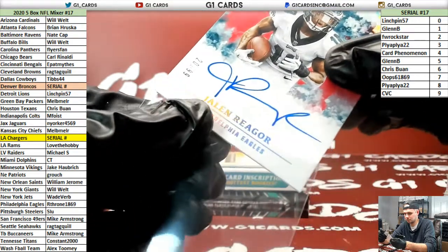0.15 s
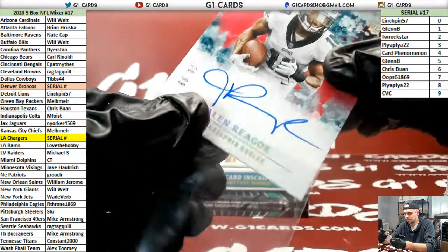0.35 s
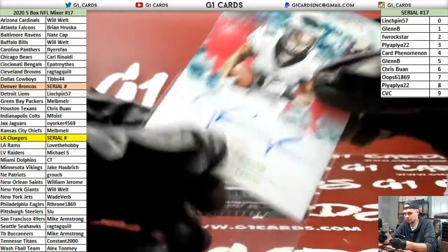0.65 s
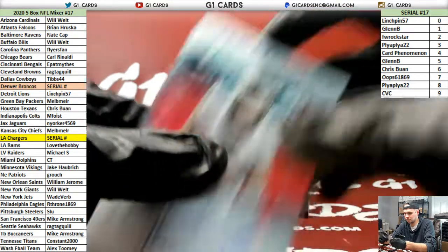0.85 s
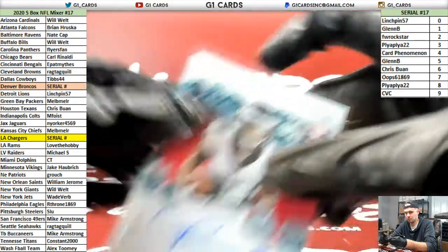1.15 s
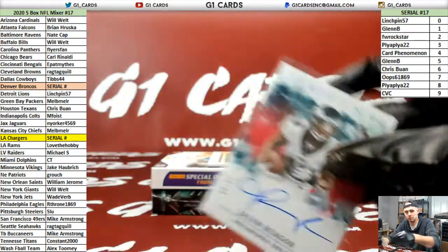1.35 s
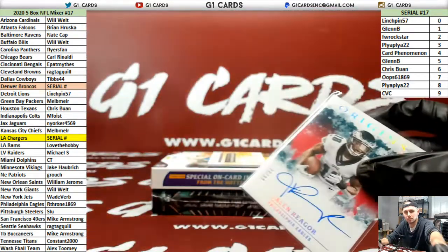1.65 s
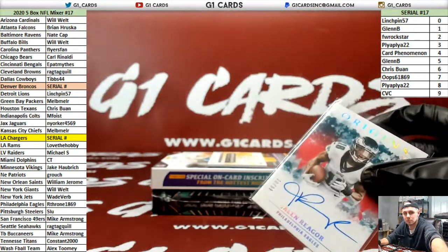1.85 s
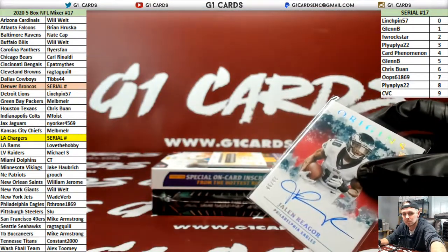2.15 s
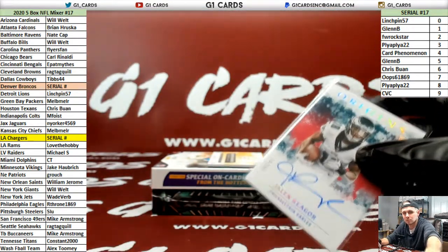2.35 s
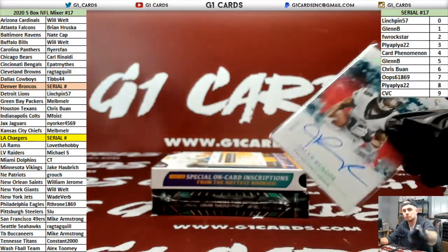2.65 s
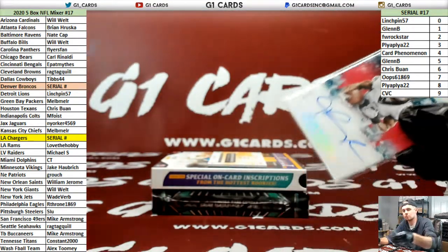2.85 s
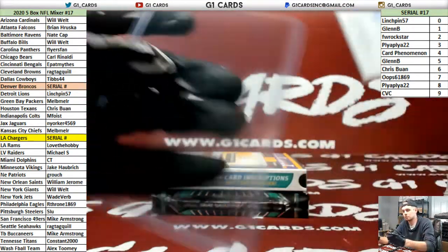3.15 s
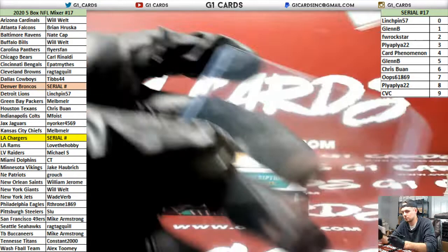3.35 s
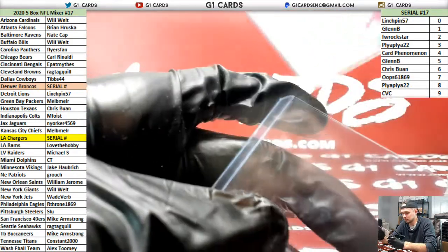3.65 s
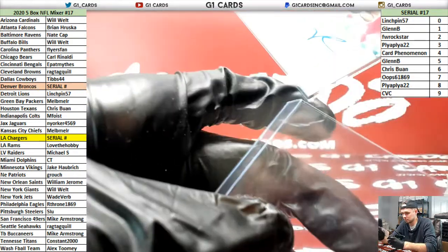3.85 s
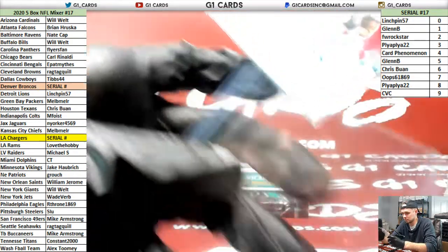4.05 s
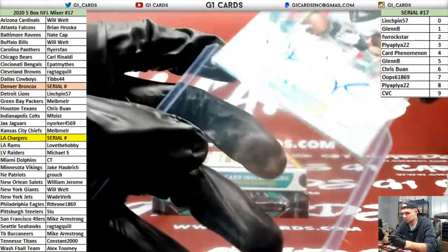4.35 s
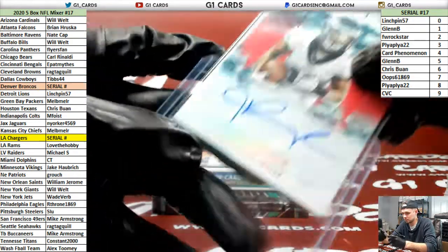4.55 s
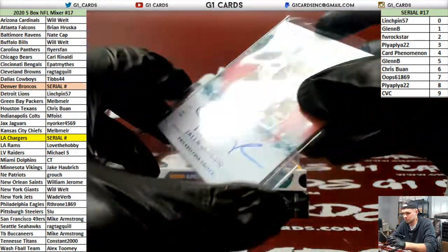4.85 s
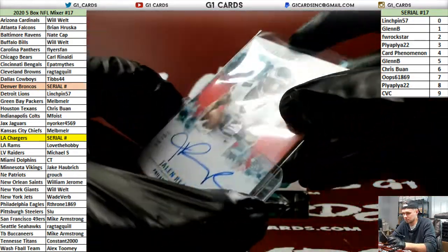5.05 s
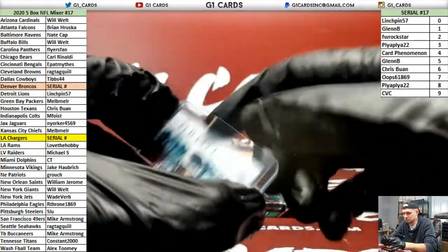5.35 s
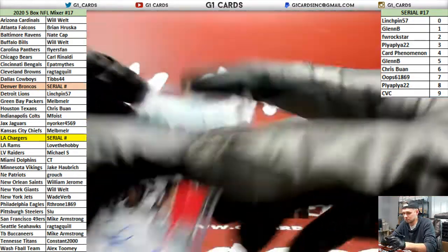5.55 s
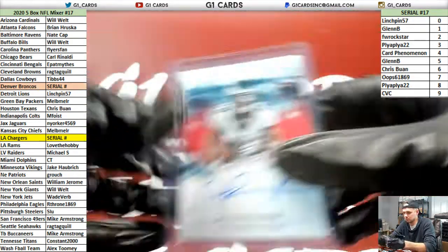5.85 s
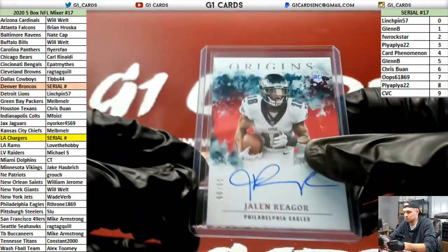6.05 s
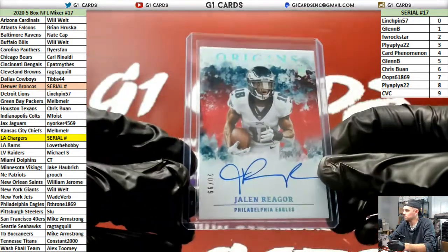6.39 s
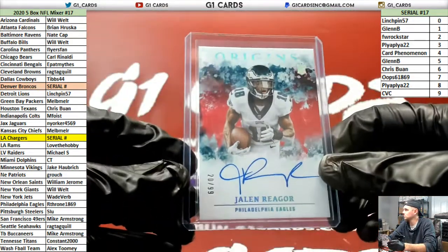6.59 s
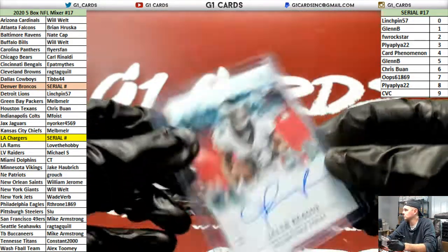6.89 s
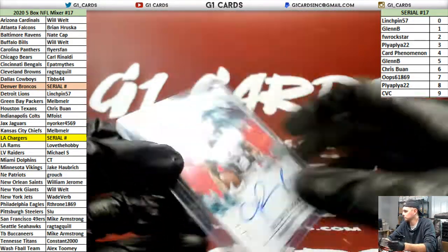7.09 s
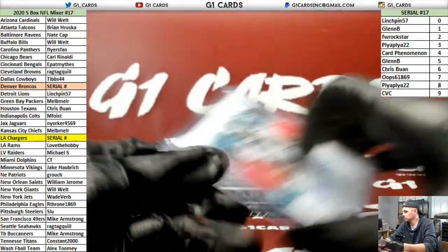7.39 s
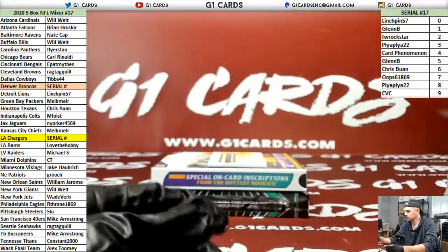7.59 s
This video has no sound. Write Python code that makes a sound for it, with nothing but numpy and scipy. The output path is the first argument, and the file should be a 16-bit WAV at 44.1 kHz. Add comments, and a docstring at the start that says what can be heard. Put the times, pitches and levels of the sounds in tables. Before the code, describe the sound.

Faint plastic rubbing and small ticks as a card is sleeved, ending with a sharp clack on a desk over low ventilation rumble.

```python
"""Sleeving a card

Gloved hands slide a card into a soft sleeve and a rigid plastic holder, close to a desk microphone.
Edges let go and tick, friction rubs the plastic's modes, and a card dragged off the stack rings in the gap.
A few soft knocks wake the desk, and the holder is set down hard at the end.
Ventilation rumbles and faint tones hum in the small dry room."""
import sys
import numpy as np
from scipy import signal
from scipy.io import wavfile
from scipy.ndimage import uniform_filter1d, map_coordinates

SR = 44100
rng = np.random.default_rng(int(sys.argv[2]) if len(sys.argv) > 2 else 0)


def dump_mix(stems):
    """Bounce the given channels to the path in sys.argv[1] as a 16-bit WAV at rate SR."""
    frames = np.atleast_2d(stems).T  # one column per channel
    limited = np.clip(frames, -1, 1)  # hard clip at full scale
    pcm = np.round(limited * 32767).astype(np.int16)
    wavfile.write(sys.argv[1], SR, pcm)


N = 340648


def gain_of(db):
    return 10 ** (np.asarray(db) / 20)


def unit_rms(x):
    return x / np.sqrt(np.mean(x ** 2) + 1e-20)


def curve_at(points, hz):
    """Interpolate (f/Hz, value) points over log frequency."""
    f, value = np.transpose(points)
    return np.interp(np.log(hz + 1), np.log(f + 1), value)


def add(mix, start_s, sound):
    part = mix[round(start_s * SR):][:len(sound)]
    part += sound[:len(part)]


def resonate(x, hz, width_hz):
    """Unity-gain resonance: shift hz to zero, smooth, shift back. hz may glide."""
    carrier = np.exp(2j * np.pi * np.cumsum(hz * np.ones(len(x))) / SR)
    pole = np.exp(-np.pi * width_hz / SR)
    return 2 * (carrier * signal.lfilter([1 - pole], [1, -pole], x / carrier + 1e-18)).real


def resonate_twice(x, hz, width_hz):
    return resonate(resonate(x, hz, width_hz), hz, width_hz)


def room_tone():
    """Ventilation rumble and hiss, low air-flow resonances and a faint wavering hum."""
    # air noise spectrum: f/Hz, relative level/dB
    spectrum = [(12, -43), (28, 3.5), (46, -3.5), (69, -1.5), (82, -10), (94, -10.5), (147, -11),
                (224, -20), (251, -15), (351, -23), (393, -18.5), (506, -25), (551, -26.5), (1180, -31),
                (4660, -47.5), (14300, -55.5), (16500, -54)]
    # air-flow resonances: f/Hz, width/Hz, rms level/dB
    fan_modes = [(66.8, 17.3, -61.5), (115.7, 14, -67.5), (252.8, 16, -77)]
    # hum tones: f/Hz, rms level/dB
    hum_tones = [(387.6, -79), (780.6, -79), (1152, -84.5)]
    frames, hz = N // 2048 + 5, np.fft.rfftfreq(8192, 1 / SR)
    real, imag, patches = rng.standard_normal((frames, 4097, 3)).T
    patches = uniform_filter1d(patches, 80, axis=0)
    patches_db = 1.65 * unit_rms(uniform_filter1d(patches, 2, axis=1))
    bins = (real + 1j * imag) * gain_of(curve_at(spectrum, hz)[:, None] + patches_db)
    air = gain_of(-54) * unit_rms(signal.istft(bins, nperseg=8192, noverlap=6144)[1][:N])
    fan = sum(gain_of(db) * unit_rms(resonate_twice(rng.standard_normal(N), f, width_hz))
              for f, width_hz, db in fan_modes)
    hum = sum(gain_of(db) * unit_rms(resonate(rng.standard_normal(N), f, width_hz=16.4))
              for f, db in hum_tones)
    return air + fan + hum


def plastic(drive, card_db, holder_db, film_db, grip, damping):
    """Damped modes of card, holder and film; grip scales each mode's frequency, damping its width."""
    # plastic modes: f/Hz, base width/Hz, relative level/dB
    modes = [(765, 650, 2), (1540, 690, 0), (2350, 490, 0), (3714, 950, 0.5), (5220, 640, -0.5),
             (6490, 1200, 2.5), (8400, 1700, 5.5), (11000, 2140, 7), (14100, 1600, 6.5)]
    colour = [(2400, card_db), (3700, holder_db), (6500, 0), (12000, film_db)]
    body = 0
    for k, (hz, width_hz, db) in enumerate(modes):
        mode = unit_rms(resonate_twice(drive, hz * grip[k], width_hz * damping))
        body += (-1) ** k * gain_of(db + curve_at(colour, hz)) * mode
    return unit_rms(body)


def tick(db, card_db, holder_db, film_db, chatter_ms, ring_hz):
    """An edge lets go and chatters to rest; the flap beside it rings. Returns (direct, to the walls)."""
    grip = 1 + 0.015 * rng.standard_normal(100)
    noise = rng.standard_normal(500)
    ms = np.arange(len(noise)) / SR * 1000
    # short chatter opens with a hard snap; long chatter swells in
    snap = 5.6 * np.exp(-chatter_ms / 2.3) * (ms < 0.03)
    chatter = noise * (1 - np.exp(-ms / (0.097 * chatter_ms)))
    blow = (chatter + snap) * np.exp(-ms / chatter_ms)
    # low rings stand out; a hard film snap leaves less ring
    ring_db = -5 - 1.5 * np.log2(ring_hz / 5000) - 0.17 * film_db
    ring = gain_of(ring_db) * unit_rms(resonate_twice(blow, ring_hz, 0.17 * ring_hz))
    near = plastic(blow, card_db, holder_db, film_db, grip, damping=1.0) + ring
    # the walls hear all directions at once, so peaks and notches partly average out
    impulse = 1.0 * (ms == 0)
    far = plastic(impulse, card_db, holder_db, film_db, grip, damping=1.4) + 0.64 * ring
    return gain_of(db) * near, gain_of(db - 0.5) * far


def friction(count, crackle_db, flutter_db, catches_per_s, catch_db=4.0):
    """Tiny uneven slips, fluttering as the grip changes; now and then the film catches."""
    slips = rng.standard_normal(count) * gain_of(crackle_db * np.minimum(rng.exponential(1, count), 5))
    flutter = unit_rms(uniform_filter1d(uniform_filter1d(rng.standard_normal(count), 400), 400))
    catches = signal.lfilter([1], [1, -0.97], rng.random(count) < catches_per_s / SR)
    return unit_rms(slips * gain_of(flutter_db * flutter) * (1 + gain_of(catch_db) * catches))


def stroke(start_s, peak_s, end_s, db, card_db, edge_hz, slips):
    """Friction swells and fades with hand speed; the leading edge sings roughly."""
    t = np.arange(start_s, end_s, 1 / SR)
    speed = np.sin(np.pi / 2 * np.clip(np.interp(t, [start_s, peak_s, end_s], [0, 1, 0]), 0, 1))
    drive = slips[round(start_s * SR):][:len(t)]
    scrape = slips[::-1][round(start_s * SR):][:len(t)]  # the edge slips on its own
    edge = unit_rms(resonate_twice(scrape, edge_hz, 0.4 * edge_hz))
    grip = rng.uniform(0.95, 1.05, 9)  # one factor per plastic mode
    holder_db, film_db = 0.17 * card_db, -11 - 0.28 * card_db  # more card, less film hiss
    body = plastic(drive, card_db, holder_db, film_db, grip, damping=2.27)
    return gain_of(db) * speed ** 0.91 * (body + gain_of(-6) * edge)


def knock(db, rise_ms, blow_hz):
    """A blow wakes the desk modes near its own pitch: low if soft, high if hard."""
    # desk modes, the close pair beating: f/Hz, relative level/dB, T60/s
    modes = [(133.3, 0.5, 0.076), (281, 0.5, 0.059), (346, -1, 0.057), (449, -3, 0.14), (467, -4.5, 0.14),
             (526, -10, 0.08), (703, -7, 0.12), (876, 3.5, 0.024), (1410, -16, 0.13)]
    t = np.arange(SR // 4) / SR
    ring = 0
    for hz, mode_db, t60_s in modes:
        onset_db = mode_db - 17.3 * np.log2(hz / blow_hz) ** 2
        ring += gain_of(onset_db - 60 * t / t60_s) * np.sin(2 * np.pi * hz * t)
    return gain_of(db) * ring * (1 - np.exp(-t * 1000 / rise_ms))


def card_drag():
    """A card drags off the stack; the gap rings, falling as it opens. Returns (start/s, sound)."""
    # course of the drag: t/s, level/dB, gap note f/Hz
    course = [(1.97, -72, 3000), (2.04, -74, 3050), (2.052, -66, 3120), (2.112, -60, 3170),
              (2.122, -58.5, 2350), (2.157, -60, 2340), (2.179, -60, 1890), (2.192, -90, 1850)]
    times_s, db, hz = np.transpose(course)
    t = np.arange(times_s[0], times_s[-1], 1 / SR)
    note_hz = np.interp(t, times_s, hz)
    slips = friction(len(t), crackle_db=0.5, flutter_db=2.0, catches_per_s=46)
    gap = resonate_twice(slips, note_hz, width_hz=600)
    corner = resonate_twice(slips[::-1], 0.62 * note_hz, width_hz=450)
    corner *= np.clip((t - 2.108) / 0.037, 0, 1)  # the loose corner joins late
    return times_s[0], gain_of(np.interp(t, times_s, db)) * unit_rms(gap + 1.44 * corner)


def desk_bounce(x):
    """Add one desk-top reflection of drifting delay: a hollow, shifting comb."""
    # extra path via the desk top: t/s, delay/ms
    path = [(0, 0.4), (.8, 0.57), (2.1, 0.75), (4.4, 0.49), (4.9, 0.41), (5.1, 0.34), (5.5, 0.5),
            (7.25, 0.4), (7.5, 0.47), (7.72, 0.49)]
    samples = np.arange(N)
    delay_ms = np.interp(samples / SR, *np.transpose(path))
    return x + gain_of(-9) * map_coordinates(x, [samples - delay_ms * SR / 1000], order=3)


def early_echoes(x):
    """Add single echoes from nearby surfaces."""
    # desk, screen and wall: delay/ms, level/dB
    echoes = [(2.6, -11.5), (5.2, -17), (10.2, -20)]
    out = x.copy()
    for delay_ms, db in echoes:
        add(out, delay_ms / 1000, gain_of(db) * x)
    return out


def room_tail():
    """Room impulse response: sparse random reflections dying band by band."""
    # room decay: f/Hz, T60/s
    decay = [(500, 0.87), (2000, 0.2), (5000, 0.18), (10000, 0.17), (16000, 0.091)]
    taps = np.zeros(SR // 2)
    slots = np.arange(120, len(taps) - 20, 20)
    taps[slots + rng.integers(0, 20, len(slots))] = rng.choice([-1., 1.], len(slots))
    hz, t, bins = signal.stft(taps, SR, nperseg=128)
    bins = bins * gain_of(-60 * t / curve_at(decay, hz)[:, None])
    tail = signal.istft(bins, SR, nperseg=128)[1]
    return tail / np.linalg.norm(tail)


def scene():
    """Ticks, rubs and knocks at the microphone, with reflections and room tone."""
    # plastic ticks: t/s, level/dB, card/dB, holder/dB, film/dB, chatter/ms, ring f/Hz
    ticks = [(0.1725, -41.5, -8, 4, 2.5, 0.63, 9100), (.332, -70, -10, 2, -17, .5, 5870),
             (.372, -75, -2, 9, -12, .6, 8400), (.42, -73, 6, 4, -17, 1, 2980),
             (.429, -69, 9, 4, -13, 1.1, 3700), (.708, -77, -7, -1, -15, .8, 7500),
             (0.8293, -57, 0, 1, 6, 2.3, 12300), (0.8346, -47, -2.5, 3, 4, 0.69, 7960),
             (0.8378, -56.5, -6, 3, 1, 2.2, 6760), (0.9764, -64.5, -14, 3.5, -8, 0.7, 8100),
             (1.621, -76, -21, -9, -26, 0.99, 7240), (1.972, -62, 9, 5, -15, 2.3, 2880),
             (2.241, -61, 1, 12, -11, 3.1, 4500), (2.2859, -55, -1, 6, -11, 2.8, 4100),
             (2.2995, -51.5, 10, 1, -9, 2, 1870), (2.4797, -64.5, -3, 1, -10, 0.65, 7540),
             (2.66, -65, 2, 7, -2, 2, 3270), (2.817, -69, 5, 14, -14, 2.1, 4270),
             (3.044, -76, -15, 0, 0, .8, 4700), (3.054, -63, -5, 6, -29, 0.53, 4600),
             (3.189, -71, -20, -10, -6, 4, 5400), (3.693, -57, -5.5, -3, -5.5, 1.4, 7850),
             (3.804, -67, 10, 3, -17, 2, 1540), (3.894, -76, -9, 4, -11, 2.4, 8650),
             (4.0081, -69, -8, 4, -7, 1.9, 2670), (4.1615, -67.5, -15, -2, -1, 0.45, 12500),
             (4.422, -68.5, -9, 1, -11, 1.76, 6100), (4.428, -69, -8, 5, -22, 3.3, 4630),
             (4.482, -70.5, 7, 5, -20, .6, 3300), (4.565, -68, 0, 10, -9, 1.5, 4650),
             (4.618, -69.5, 10, 0, -18, 3, 1780), (4.6962, -72, -3, -5, -22, 1.6, 5800),
             (4.708, -71.5, 6, 0, -24, 3.4, 2900), (4.742, -74, -13, -4, -15, .6, 5900),
             (5.057, -70, -18, -7, -15, 1.3, 5500), (5.2106, -57, -7.5, -1, -8, 0.46, 5970),
             (5.2512, -54.5, -4, 2, -11, 1.7, 2400), (5.32, -73.5, 8, -5, -20, 3, 2100),
             (5.393, -72, -7, 2, -11, 0.63, 4040), (5.501, -59.5, 5, -1, -6, 1.8, 2470),
             (5.6495, -66, 4, -4, -9, 2.4, 4700), (5.757, -72.5, -1, 6, -15, 0.86, 3320),
             (6.72, -78, 3, 2, -8, 2, 2710), (6.819, -72, -15, -6, -18, 0.91, 4730),
             (7.103, -69, 18, 2, -16, 1.1, 1500), (7.655, -71, -12, 3, -18, 1.1, 5860),
             (7.7125, -41.5, 9, 4, -10, 2.7, 3100), (7.7193, -29.5, -9, 4, -19, 0.18, 4760)]
    # strokes of glove, sleeve and card: start/s, peak/s, end/s, level/dB, card/dB, edge f/Hz
    strokes = [(0.34, 0.405, 0.51, -74.5, -7, 8500), (0.65, 0.825, 0.95, -70.5, -27, 13100),
               (0.947, 0.99, 1.1, -73.5, 15, 6440), (1.046, 1.182, 1.19, -78, -2, 2620),
               (1.952, 2.008, 2.14, -71.5, 12, 5850), (2.058, 2.146, 2.213, -61.5, 11.5, 4440),
               (2.21, 2.3, 2.43, -69.5, 6, 5430), (2.454, 2.5, 2.9, -77, 0, 7040),
               (2.641, 2.647, 2.67, -68.5, 3, 3000), (2.756, 2.812, 2.95, -76.5, 1, 3180),
               (2.923, 2.95, 3.01, -70, -1, 6400), (3.013, 3.05, 3.5, -84, -6, 4210),
               (3.795, 3.83, 3.83, -65.5, 12, 1620), (3.858, 4.023, 4.27, -78, -5, 11400),
               (4.278, 4.41, 4.47, -73, -7, 11000), (4.423, 4.43, 4.62, -74.5, 2, 4370),
               (4.525, 4.545, 4.7, -82.5, -2, 4000), (4.602, 4.64, 4.63, -73, 11, 4630),
               (4.666, 4.706, 4.78, -74, -3, 2900), (4.76, 4.785, 4.87, -74.5, -1, 4340),
               (4.892, 5.026, 5.1, -72.5, -26, 7610), (5.065, 5.127, 5.32, -66, -6, 2520),
               (5.265, 5.277, 5.315, -64.5, 6, 2570), (5.426, 5.476, 5.56, -72, 3, 6960),
               (5.491, 5.518, 5.53, -62, 0, 7300), (5.58, 5.657, 6.1, -80, -3, 4970),
               (6.2, 6.224, 5.5, -71.5, 9, 2500), (6.737, 6.8, 6.838, -71.5, -11, 4930),
               (6.88, 6.937, 6.98, -77.5, -5, 6000), (6.966, 7.05, 7.08, -75, 3, 6070),
               (7.087, 7.147, 7.16, -77.5, -3, 5000), (7.226, 7.47, 7.71, -67, 0, 7200),
               (7.286, 7.377, 7.55, -73, 34, 1897)]
    # knocks on the desk: t/s, level/dB, rise/ms, blow f/Hz
    knocks = [(1.556, -30, 3.2, 167), (1.742, -53.5, 0.88, 776), (2.3005, -32, 1.5, 520),
              (5.65, -55, 1.1, 765), (7.102, -55, 0.56, 670), (7.7194, -25.5, 0.47, 806)]
    rubs, ticks_near, ticks_far, desk = np.zeros((4, N))
    slips = friction(N, crackle_db=3.5, flutter_db=1.5, catches_per_s=25)
    for start_s, *settings in strokes:
        add(rubs, start_s, stroke(start_s, *settings, slips))
    for start_s, *settings in ticks:
        near, far = tick(*settings)
        add(ticks_near, start_s, near)
        add(ticks_far, start_s, far)
    for start_s, *settings in knocks:
        add(desk, start_s, knock(*settings))
    add(rubs, *card_drag())
    reverb = gain_of(-7.5) * signal.oaconvolve(ticks_far + rubs + 0.15 * desk, room_tail())[:N]
    airborne = early_echoes(ticks_near + desk_bounce(rubs))
    # the desk reaches the microphone through its stand, without early echoes
    return (airborne + desk + reverb + room_tone())[None]


def record(dry):
    """Steep low-pass band limit."""
    cutoff_hz = 15950
    lowpass = signal.firwin(511, cutoff_hz, window=("kaiser", 9), fs=SR)
    return signal.oaconvolve(dry, lowpass[None], "same")


dry = scene()
out = record(dry)
dump_mix(out)
```